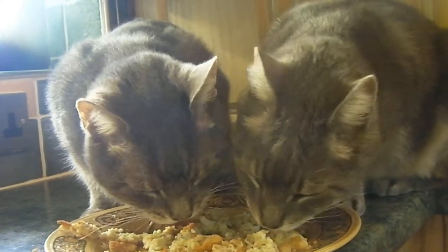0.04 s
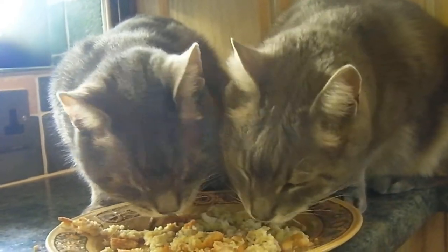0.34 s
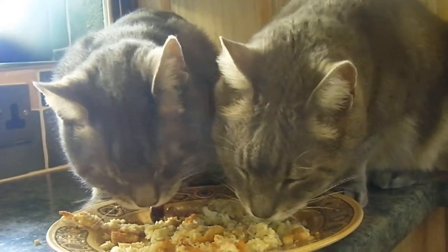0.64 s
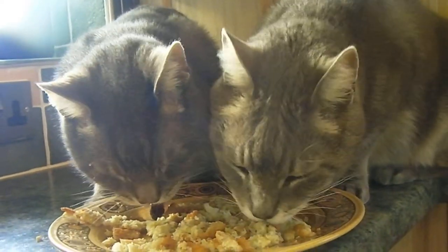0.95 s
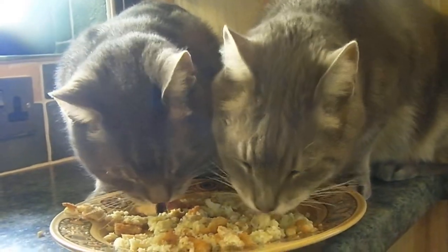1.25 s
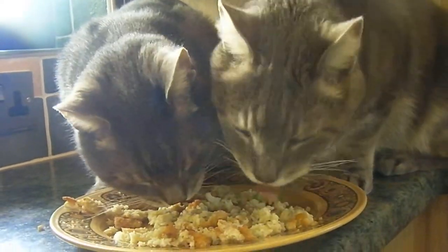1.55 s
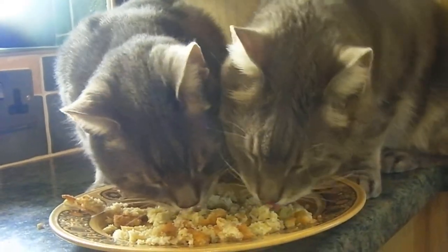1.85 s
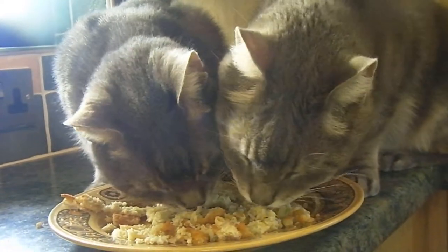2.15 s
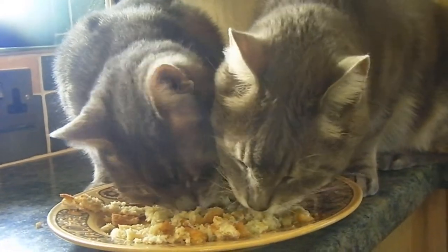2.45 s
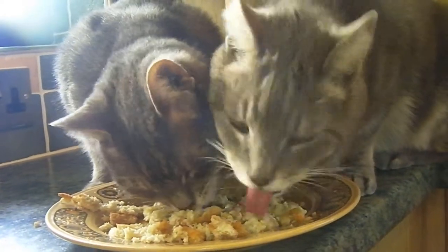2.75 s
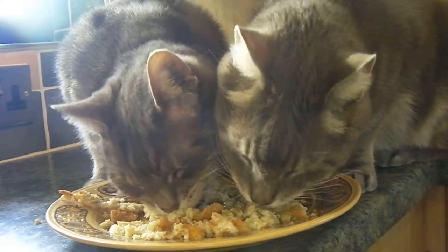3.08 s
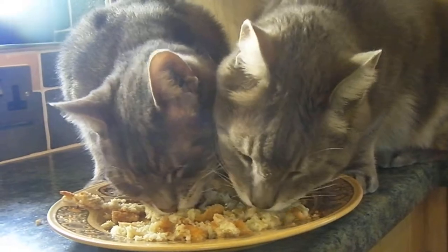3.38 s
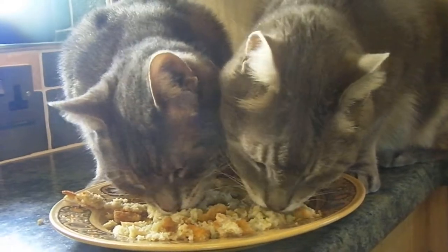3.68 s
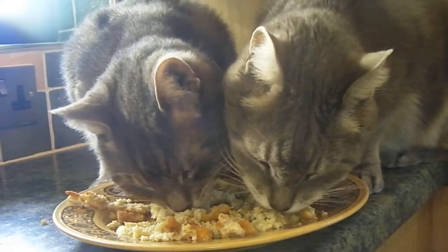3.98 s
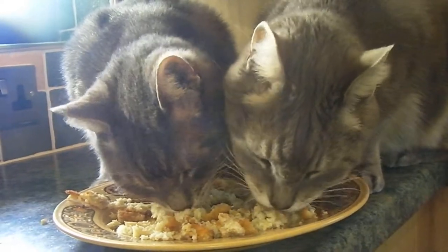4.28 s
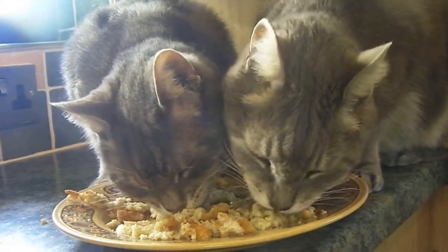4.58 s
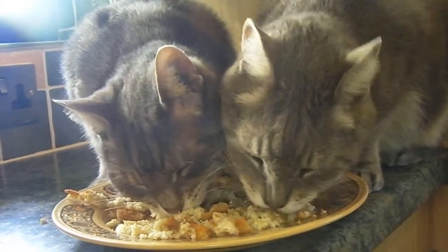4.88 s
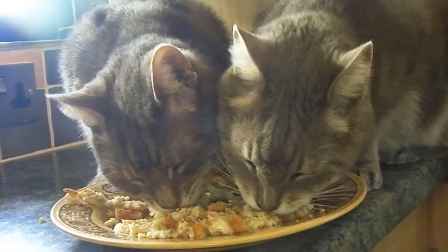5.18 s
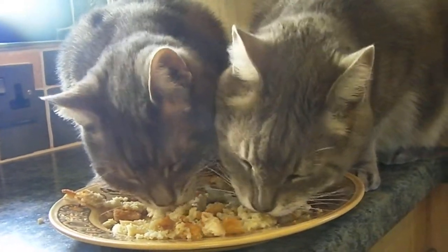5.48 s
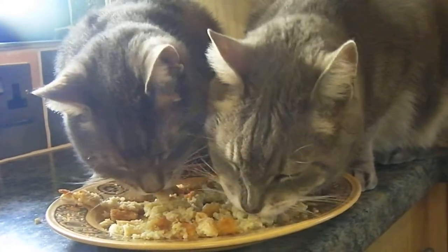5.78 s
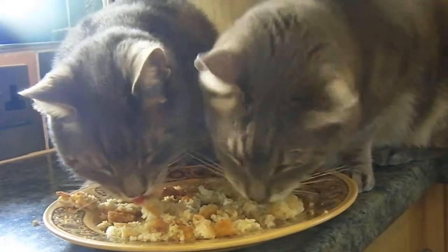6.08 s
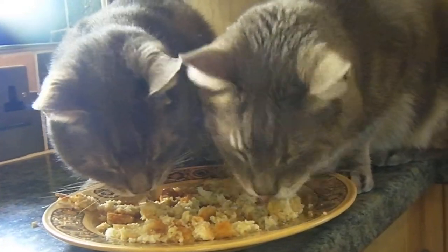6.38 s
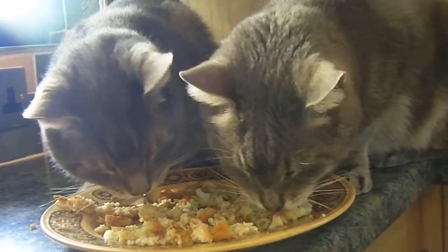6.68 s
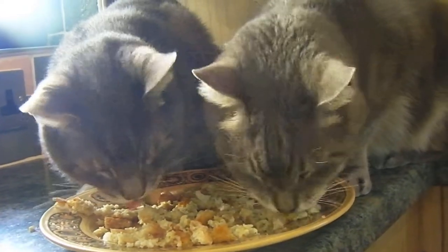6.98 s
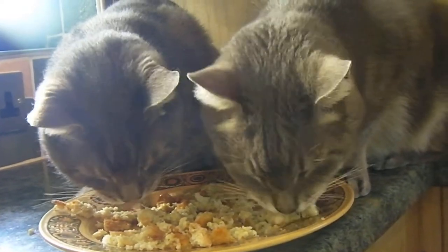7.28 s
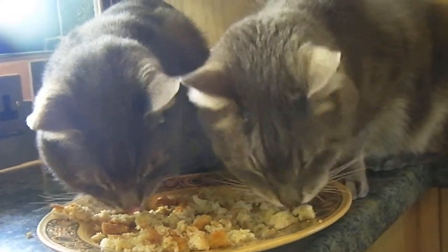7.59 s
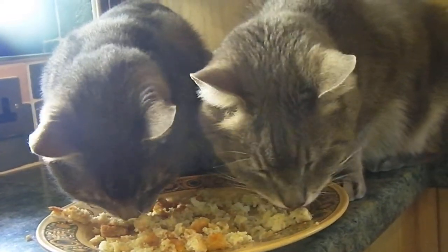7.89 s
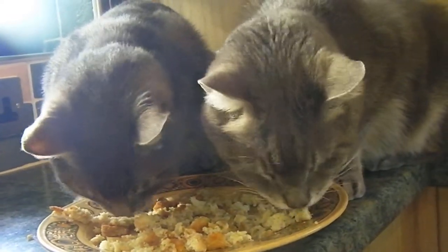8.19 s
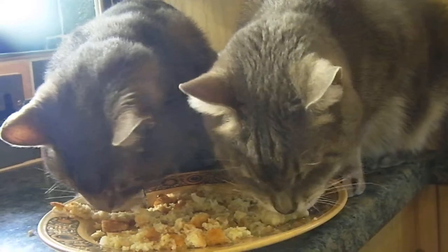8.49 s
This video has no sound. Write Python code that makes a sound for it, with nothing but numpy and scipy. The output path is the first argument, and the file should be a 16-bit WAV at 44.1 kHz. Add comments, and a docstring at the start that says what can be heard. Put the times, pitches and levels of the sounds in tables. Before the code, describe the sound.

Two cats eat soft food up close, with wet chewing, lip smacks and occasional knocks and clinks of a ceramic plate.

```python
"""A quiet kitchen, close up: two cats eat soft fish cake from a ceramic plate.
Each chew squelches with tiny bursting bubbles and pops in the mouth cavity; saliva films tear in clicks.
Teeth slip on the glaze in squeaks and catch the rim in bright clinks, and now and then the nudged
plate knocks on the worktop. Short reflections surround it all, over faint room noise, hiss and hum."""
import sys
import numpy as np
from scipy import signal
from scipy.fft import rfft, irfft, next_fast_len
from scipy.io import wavfile
from scipy.ndimage import uniform_filter1d

SR = 44100
rng = np.random.default_rng(int(sys.argv[2]) if len(sys.argv) > 2 else 0)


def store_pcm(level_fs):
    """Save levels as 16-bit WAV."""
    pcm = np.round(np.clip(level_fs, -1, 1) * 32767).astype(np.int16)
    wavfile.write(sys.argv[1], SR, np.atleast_2d(pcm).T)


N = 381024

# bites and licks: start_s, length_s, level_db, opening (about -1 shut and fizzy, 1 open and hollow)
CHEWS = [(0.0, 0.022, -47.5, -0.13), (0.071, 0.064, -65, 0.5), (0.901, 0.066, -62.5, 0.89),
         (1.062, .06, -55, 0.32), (1.295, 0.045, -51.5, 0.32), (1.46, .07, -52.5, .35),
         (1.528, 0.13, -58, 0.72), (1.862, 0.075, -56, 0.049), (1.939, 0.062, -57, 0.47),
         (2.033, .1, -63, 0.086), (2.278, .16, -56.5, -0.07), (2.48, 0.12, -55, -0.39),
         (2.772, .19, -60.5, -0.093), (3.196, 0.069, -57.5, 0.79), (3.249, 0.11, -51.5, -0.62),
         (3.433, 0.046, -54.5, -1), (4.005, 0.066, -64, -0.31), (4.163, 0.044, -58.5, -.6),
         (4.373, .08, -66, -0.5), (4.919, .13, -64, 0.35), (5.531, .09, -64, -1.1),
         (6.553, 0.082, -55.5, -0.16), (6.734, 0.19, -61.5, 0.2), (7.075, 0.19, -53.5, 0.038),
         (7.386, 0.14, -59, 0.47), (7.522, 0.029, -44, -0.19), (7.709, 0.12, -52.5, -0.16),
         (7.88, 0.05, -55.5, -0.82), (8.06, .1, -63, -0.24), (8.253, 0.095, -53.5, 0.36),
         (8.344, .065, -51.5, -0.55), (8.544, 0.036, -49.5, -0.5)]
# tone colours of wet bubbles and of fine saliva fizz: freq_hz, level_db
WET_COLOUR = [(1200, -4), (2000, -1), (3000, 8), (3700, -2), (4600, 5), (6000, 0), (8000, -30)]
FIZZ_COLOUR = [(4000, -27), (6300, 3), (7200, 6), (7900, -4), (9200, 3), (12000, -5.5), (16000, -10)]
# the plate's ringing modes: pitch_hz, knocked_db, rim_struck_db, t60_s
PLATE_MODES = [(2026, -18, -59, 0.12), (2625, -14.5, -40, 0.073), (2857, -5, -32, 0.036),
               (3030, -3, -33, 0.11), (3350, -17, -47, 0.11), (4050, -8, -37, .06), (4200, -5, -30, 0.1),
               (4320, -11, -18, 0.046), (4780, -21, -8, 0.087), (4800, -26, -10, 0.13),
               (4920, -7.5, -8, 0.065), (5360, -10, -30, 0.06), (5740, -4, -19, 0.14),
               (5740, 0.5, -34, 0.072), (6680, -19, -33, 0.073), (7204, 2.5, -3.5, 0.065),
               (8720, -25.5, -26, 0.29), (9000, -31, -26, 0.046), (10390, -23, -0.5, 0.11),
               (10750, -22, -16, 0.1), (12529, -26, -31, 0.058), (13190, -26, 0, 0.064)]


def from_db(db):
    """Decibels to gain."""
    return 10 ** (np.asarray(db) / 20)


def unit_rms(x):
    """Scale to rms 1."""
    return x / np.sqrt(np.mean(x ** 2) + 1e-20)


def at_hz(points, hz):
    """Read a curve on a log-frequency axis."""
    points = np.array(points)
    return np.interp(np.log(np.maximum(hz, 1)), np.log(points[:, 0]), points[:, 1])


def seconds(length_s):
    """A time axis."""
    return np.arange(int(length_s * SR)) / SR


def add(track, start_s, sound):
    """Mix a sound into a track from start_s on."""
    start = max(int(start_s * SR), 0)
    part = sound[:max(N - start, 0)]
    track[start:start + len(part)] += part


def decay(t, t60_s):
    """An envelope that falls by 60 dB in t60_s."""
    return np.exp(-np.log(1000) * t / t60_s)


def coloured(x, colour):
    """Give a noise a tone colour; rms 1."""
    size = x.shape[-1]
    gain = from_db(at_hz(colour, np.fft.rfftfreq(size, 1 / SR)))
    return unit_rms(irfft(rfft(x) * gain, size))


def stereo_noise(correlation, size):
    """White noise whose left-right correlation follows a curve over frequency."""
    mid, side = rfft(rng.standard_normal((2, size)))
    alike = np.clip(at_hz(correlation, np.fft.rfftfreq(size, 1 / SR)), 0, 1)
    return irfft(np.sqrt(1 + alike) * mid + np.sqrt(1 - alike) * side * [[1], [-1]], size)


def grains(per_s, spread_db, size):
    """Tiny ruptures at random moments, of unequal strength."""
    born = rng.random(size) < per_s / SR
    return born * rng.choice([-1, 1], size) * from_db(spread_db * np.minimum(rng.exponential(1, size), 4))


def room_tone(air_db=-60, hiss_db=-56, waver_rad=0.77):
    """Low room noise, even hiss and a slightly wavering appliance hum."""
    # colours of the low air and the hiss: freq_hz, level_db
    air_colour = [(15, -45), (25, -17), (60, -11), (95, 0.5), (123, 0), (206, -4.5), (257, -12), (295, -6),
                  (356, -1.5), (408, -1), (637, -8), (706, -6), (897, -9.5), (1500, -13.5), (1950, -37),
                  (3300, -120)]
    hiss_colour = [(700, -11.5), (1500, 0.5), (2100, 0.5), (3000, 1.5), (3700, 0.5), (5000, 0),
                   (7000, -0.5), (7900, -6.5), (9000, 1.5), (10000, -7), (13000, -5), (16000, -9.5)]
    # stereo image, narrow in the bass and wide on top: freq_hz, correlation
    image = [(30, 1), (120, 0.86), (500, 0.87), (2000, 0.71), (5000, 0.35), (9000, 0.064), (15000, 0.13)]
    # the appliance's tones: pitch_hz, level_db
    hum_tones = [(118.4, -70), (317.6, -71), (403.7, -74), (2013, -79.5)]
    air = from_db(air_db) * coloured(stereo_noise(image, N), air_colour)
    hiss = from_db(hiss_db) * coloured(stereo_noise(image, N), hiss_colour)
    hum, t = np.zeros(N), np.arange(N) / SR
    knots = np.linspace(0, t[-1], 60)
    for hz, db in hum_tones:
        drift = waver_rad * np.interp(t, knots, rng.standard_normal(len(knots)))
        hum += from_db(db) * np.sqrt(2) * np.sin(2 * np.pi * hz * t + drift)
    return air + hiss + hum


def nibbling(level_db=-67):
    """Faint, sparse ticks of two mouths that never rest."""
    wet = coloured(grains(per_s=35, spread_db=1.86, size=N), WET_COLOUR)
    fizz = coloured(grains(per_s=45, spread_db=3.1, size=N), FIZZ_COLOUR)
    return from_db(level_db) * (wet + fizz)


def bubbles(colour, per_s, spread_db, cycles, cavities=18):
    """Ruptures ring small cavities of many pitches, coloured by the mouth; rms 1."""
    out, clicks = np.zeros(N), grains(per_s, spread_db, N)
    cavity = rng.integers(0, cavities, N)
    for k, hz in enumerate(np.geomspace(colour[0][0], colour[-1][0], cavities)):
        radius, angle = decay(1 / SR, cycles / hz), 2 * np.pi * hz / SR
        resonator = [1 - radius, 0, radius - 1], [1, -2 * radius * np.cos(angle), radius ** 2]
        out += signal.lfilter(*resonator, clicks * (cavity == k) + 1e-18)
    return coloured(out, colour)


def squelches(arch_power=0.21):
    """Each chew is a swell of bursting bubbles: hollow in an open mouth, fizzy in a shut one, always wet."""
    # colour of the open mouth: freq_hz, level_db
    hollow_colour = [(200, -55), (400, 10), (700, 14.5), (1000, 4.5), (1400, 15.5), (2000, 1), (3000, -35)]
    hollow = bubbles(hollow_colour, per_s=900, spread_db=2.3, cycles=37)
    wet = bubbles(WET_COLOUR, per_s=1500, spread_db=2.8, cycles=19)
    fizz = bubbles(FIZZ_COLOUR, per_s=2200, spread_db=4, cycles=16)
    out = np.zeros(N)
    for layer, layer_db, db_per_opening in (hollow, -6.5, 12), (wet, 0, 0), (fizz, -8, -11):
        swell = np.zeros(N)
        for start_s, length_s, db, opening in CHEWS:
            arch = np.abs(np.sin(np.linspace(0, np.pi, int(length_s * SR)))) ** arch_power
            add(swell, start_s, from_db(db + layer_db + db_per_opening * opening) * arch)
        out += swell * layer
    return out


def mouth_pops(pitch_hz=686, cycles=14.6, rise=4.6, trim_db=4.5, db_per_opening=19.5):
    """About a third into each chew the mouth cavity rings low, rising in pitch as it opens."""
    out, t = np.zeros(N), seconds(0.06)
    for start_s, length_s, db, opening in CHEWS:
        hz = pitch_hz * (1 + 0.039 * rng.standard_normal())
        pop = np.sin(2 * np.pi * hz * t * (1 + rise * t)) * decay(t, cycles / hz)
        add(out, start_s + 0.35 * length_s, from_db(db + trim_db + db_per_opening * opening) * pop)
    return out


def tooth_squeaks(trim_db=-3.5, waver=0.05, octave_db=-20.5):
    """Teeth stick and slip on the glaze: milliseconds of unsteady tone."""
    # each slip: start_s, level_db, pitch_hz, length_s
    slips = [(.008, -28.5, 4460, 0.0032), (.7155, -36, 4520, 0.012), (.7307, -30.5, 4860, 0.0092),
             (1.0676, -31.5, 4610, 0.015), (1.452, -39, 4800, 0.017), (2.375, -43, 5220, 0.032),
             (2.4447, -25, 4780, 0.0028), (5.867, -29.5, 4700, 0.014), (6.614, -28.5, 4810, 0.008),
             (6.621, -29, 1860, 0.0041), (7.177, -20, 4690, 0.0047), (8.27, -31, 4830, .0036),
             (8.4265, -22.5, 4480, .0033), (8.549, -25, 4630, 0.0021)]
    out, t = np.zeros(N), seconds(0.05)
    for start_s, db, hz, length_s in slips:
        jitter = unit_rms(uniform_filter1d(rng.standard_normal(len(t)), size=30))
        phase = 2 * np.pi * np.cumsum(hz * (1 + waver * jitter)) / SR
        tone = np.sin(phase) + from_db(octave_db) * np.sin(2 * phase)
        age = 4 * t / length_s   # the envelope peaks a quarter of the way in
        add(out, start_s, from_db(db + trim_db) * age * np.exp(1 - age) * tone)
    return out


def small_smacks(per_s=9, level_db=-33, pitch_hz=3200, spread_octaves=0.12, most=3):
    """Lesser clicks fall at random in the chews, more in long ones: rows of start_s, level_db, pitch_hz."""
    rows = []
    for start_s, length_s, _, _ in CHEWS:
        draws = np.hstack([rng.random((most, 2)), rng.standard_normal((most, 2))])
        for k, (place, chance, strength, detune) in enumerate(draws):
            if k + chance < per_s * length_s:
                hz = pitch_hz * 2 ** (spread_octaves * detune)
                rows.append((start_s + place * length_s, level_db + 0.5 * strength, hz))
    return rows


def lip_smacks(lag_s=0.00095, cavity_t60_s=0.0013, snap_db=-5.5, snap_scatter_db=3.5):
    """A saliva film tears in quick snaps, the small cavity behind it rings, and droplets crackle after."""
    # the main wet clicks of lips and tongues: start_s, level_db, pitch_hz
    main_smacks = [(.1054, -26.5, 3200), (1.3224, -32, 5630), (1.4286, -19.5, 4970), (1.51, -31, 2920),
                   (1.9649, -26, 3200), (2.05, -35.5, 2820), (2.8998, -33, 2800), (2.6125, -32.5, 3060),
                   (2.6852, -27.5, 3570), (2.884, -31, 3800), (2.9406, -30, 3000), (3.6476, -31.5, 3400),
                   (3.709, -27, 7350), (3.871, -23.5, 6840), (4.0138, -33, 3250), (4.3106, -31.5, 6520),
                   (4.4176, -36.5, 3130), (4.815, -35, 2950), (4.8837, -34.5, 9000), (4.9586, -40, 4440),
                   (5.0742, -35, 4830), (5.225, -22, 4200), (5.2939, -29.5, 3270), (5.5987, -29, 3680),
                   (5.9828, -34, 3270), (6.6945, -33, 2950), (6.8166, -35, 3500), (7.636, -41, 2230),
                   (7.8945, -24, 10050), (8.3384, -27, 5700), (8.3677, -15, 6500), (8.3733, -23, 5540)]
    out, t = np.zeros(N), seconds(0.04)
    for start_s, db, hz in list(main_smacks) + small_smacks():
        snap_gain = from_db(snap_db + snap_scatter_db * rng.standard_normal())
        pulse = droplet(t, hz, cavity_t60_s * hz) + snap_gain * droplet(t, hz=8000, cycles=7.3)
        tear = from_db(-9) * grains(per_s=2500, spread_db=1, size=len(t)) * decay(t, 0.015)
        spray = from_db(-12.5) * grains(per_s=1500, spread_db=0.87, size=len(t)) * decay(t, 0.034)
        ruptures = np.clip(tear + spray, -0.7, 0.7)
        ruptures[0] = 1   # the first is the strongest
        click = signal.fftconvolve(ruptures, pulse)[:len(t)]
        add(out, start_s + lag_s, from_db(db) * click / np.abs(click).max())
    # soft tissue rounds off both ends of the spectrum
    return signal.sosfilt(signal.butter(2, [1500, 12000], "band", fs=SR, output="sos"), out + 1e-18)


def droplet(t, hz, cycles):
    """A tiny cavity swells within half a cycle and rings for a few more; peak 1."""
    pulse = np.sin(2 * np.pi * hz * t) * (1 - np.exp(-2 * hz * t)) * decay(t, max(cycles, 2) / hz)
    return pulse / np.abs(pulse).max()


def plate_strike(t, mode_db, crack_colour, tilt_db_per_octave, crack_db, crack_t60_s, attack_s=0.00017):
    """One blow on the plate: ringing modes and a short noisy crack, brighter for a harder contact."""
    modes = np.array(PLATE_MODES)
    hz, t60_s = modes[:, [0]], modes[:, [3]]
    gain = from_db(mode_db[:, None] + tilt_db_per_octave * np.log2(hz / 5000) + rng.normal(0, 0.74, hz.shape))
    phase = 2 * np.pi * rng.random((2, len(hz), 1))
    # the uneven load of food gives each mode a weaker twin, 16 to 48 Hz away, that beats with it
    twin_hz = hz + 16 * rng.choice([-1, 1], hz.shape) * (1 + 2 * rng.random(hz.shape))
    pairs = np.sin(2 * np.pi * hz * t + phase[0]) + 0.5 * np.sin(2 * np.pi * twin_hz * t + phase[1])
    ring = np.sum(gain * pairs * decay(t, t60_s), axis=0) / np.sqrt(np.sum(gain ** 2))
    tilted = [(f, db + tilt_db_per_octave * np.log2(f / 5000)) for f, db in crack_colour]
    crack = from_db(crack_db) * coloured(rng.standard_normal(len(t)), tilted) * decay(t, crack_t60_s)
    return (1 - np.exp(-t / attack_s)) * (ring + crack) / (2 * np.sqrt(1 + from_db(crack_db) ** 2))


def plate_knocks(trim_db=0.5, thud_t60_s=0.12, thud_attack_s=0.0011, cushioned_mode=4):
    """The nudged plate rocks against the worktop, which answers with a dull thud."""
    # knocks, the hard ones with a rebound or two: start_s, level_db, tilt_db_per_octave
    knocks = [(0.6411, -18.5, -3), (2.562, -31.5, -7), (3.033, -28.5, -5.5), (3.2596, -30.5, -9),
              (3.496, -24, -1.5), (4.603, -32.5, -3.5), (4.9821, -34, -2.5), (5.7042, -4, 0.5),
              (5.7191, -10.5, 0), (5.726, -10.5, 7), (5.884, -33.5, -12), (6.388, -3.5, 3),
              (6.4041, -10.5, 0), (6.4509, -14.5, -1), (6.506, -27.5, -2), (7.1274, -23.5, -3.5),
              (7.2371, -12.5, -3), (7.5102, -22, -7), (7.7256, -38, -12), (7.744, -30.5, -12),
              (7.756, -34.5, -11), (8.2175, -16, -3.5), (8.426, -32, -6), (8.556, -36, -8),
              (8.614, -33, -13)]
    # colours of the plate's crack and the worktop's thud: freq_hz, level_db
    crack_colour = [(100, -64), (900, -37), (1800, -19), (2650, -8), (3500, -15), (4200, 8.5), (5200, -16),
                    (6300, -10), (7300, -28), (7900, -28), (8700, -8), (11000, -37), (15000, -57)]
    thud_colour = [(100, -30), (190, -3), (270, -33), (380, 9), (490, -11), (640, 5), (1000, -11.5),
                   (1400, -2.5), (2200, -27.5), (4000, -28)]
    out, t = np.zeros(N), seconds(0.25)
    for start_s, db, tilt in knocks:
        mode_db = np.array(PLATE_MODES)[:, 1]
        # a faint overtone rings more in soft, dull knocks cushioned by food
        mode_db[cushioned_mode] += 3 - 0.23 * tilt
        ring = plate_strike(t, mode_db, crack_colour, tilt, crack_db=-5, crack_t60_s=0.057)
        envelope = decay(t, thud_t60_s) * (1 - np.exp(-t / thud_attack_s))
        thud = coloured(rng.standard_normal(len(t)), thud_colour) * envelope
        thud_db = -33 - 0.41 * db   # soft knocks have a larger share of thud
        add(out, start_s, from_db(db + trim_db) * (ring + from_db(thud_db) * thud))
    return out


def rim_clinks(trim_db=-1):
    """A tooth catches the rim: the small, hard contact wakes the high modes and leaves the bass alone."""
    # each catch: start_s, level_db
    clinks = [(6.037, -25.5), (6.0489, -22), (6.0715, -20), (6.0803, -9), (6.092, -22), (6.1358, -7),
              (6.152, -11.5), (6.162, -20), (6.2547, -25.5)]
    # colour of the clink's crack: freq_hz, level_db
    crack_colour = [(100, -47), (700, -36.5), (1800, -20.5), (3800, -7), (4800, 6), (6500, -2.5),
                    (7900, -8), (9000, 3), (10500, 14), (12000, -0.5), (13300, -3), (15500, -8)]
    out, t = np.zeros(N), seconds(0.25)
    mode_db = np.array(PLATE_MODES)[:, 2]
    for start_s, db in clinks:
        tilt = -1 + 0.44 * db   # softer clinks are duller
        ring = plate_strike(t, mode_db, crack_colour, tilt, crack_db=-4.5, crack_t60_s=0.055)
        add(out, start_s, from_db(db + trim_db) * ring)
    return signal.sosfilt(signal.butter(2, 400, "high", fs=SR, output="sos"), out + 1e-18)


def kitchen_reverb(direct, tail_db=-3.5, build_up_s=0.00065):
    """Direct sound, then dense reflections from worktop and tiles that linger longest in the mids."""
    # the room's decay: freq_hz, t60_s
    room_decay = [(200, 0.18), (1000, 0.36), (3000, 0.22), (7000, 0.2), (15000, .18)]
    # stereo image of the reflections: freq_hz, correlation
    image = [(200, 0.87), (3000, 0.97), (7000, 0.59), (10000, 0.12), (15000, 0.24)]
    # the microphone's two sides favour different parts of the treble: freq_hz, left_minus_right_db
    balance = [(3000, 0), (4500, .5), (7300, .7), (9000, -2), (10400, -4), (11800, 0), (13200, 2),
               (16000, 1)]
    t = seconds(0.4)
    noise, tail = stereo_noise(image, len(t)), np.zeros((2, len(t)))
    edges_hz = np.geomspace(100, 17000, 9)
    for low, high in zip(edges_hz, edges_hz[1:]):
        band = signal.sosfilt(signal.butter(2, [low, high], "band", fs=SR, output="sos"), noise)
        tail += band * decay(t, at_hz(room_decay, np.sqrt(low * high)))
    tail = from_db(tail_db) * unit_rms(tail * (1 - np.exp(-t / build_up_s))) / np.sqrt(len(t))
    size = next_fast_len(N + len(t))
    lean = from_db(at_hz(balance, np.fft.rfftfreq(size, 1 / SR)) * [[0.5], [-0.5]])
    return irfft(rfft(direct, size) * (1 + rfft(tail, size)) * lean, size)[:, :N]


def scene():
    """Plate and mouths sound in the kitchen, over its room tone."""
    plate = plate_knocks() + rim_clinks() + tooth_squeaks()
    mouths = squelches() + mouth_pops() + nibbling() + lip_smacks()
    return kitchen_reverb(plate + mouths) + room_tone()


def record(dry):
    """A steep low-pass cuts the top just under 16 kHz."""
    return signal.sosfilt(signal.ellip(10, 0.1, 80, 15950, fs=SR, output="sos"), dry)


dry = scene()
out = record(dry)
store_pcm(out)
```